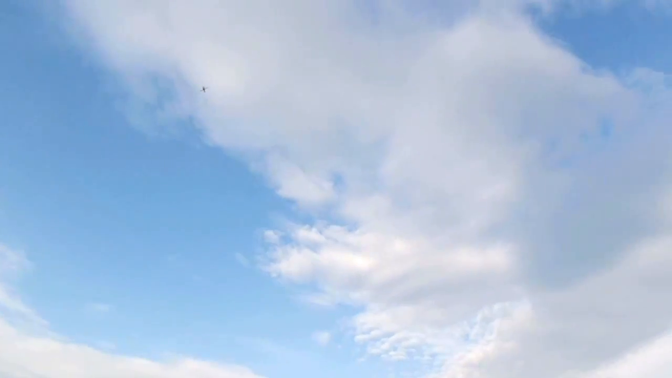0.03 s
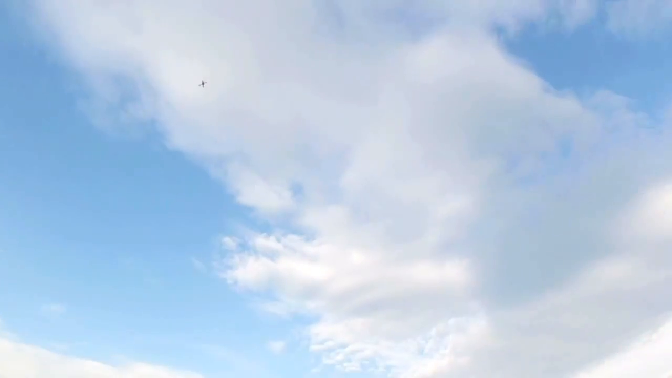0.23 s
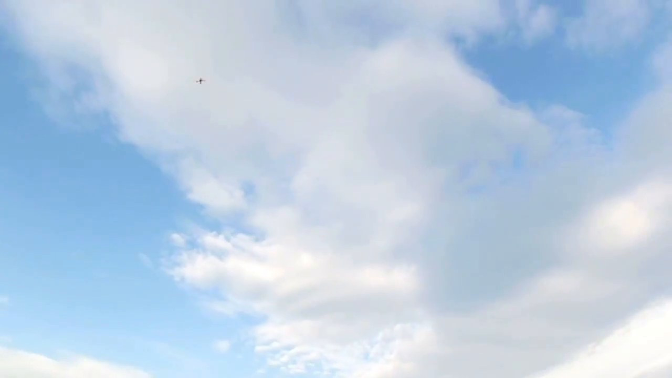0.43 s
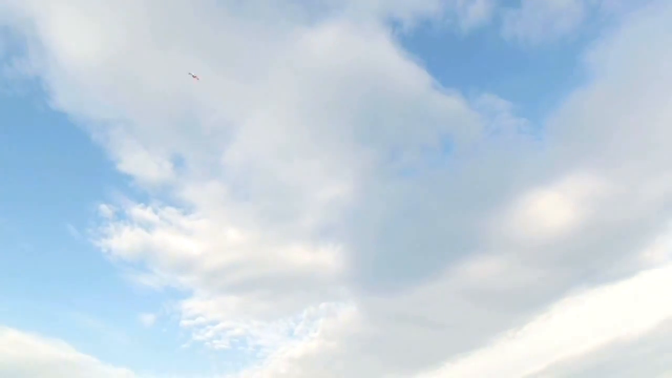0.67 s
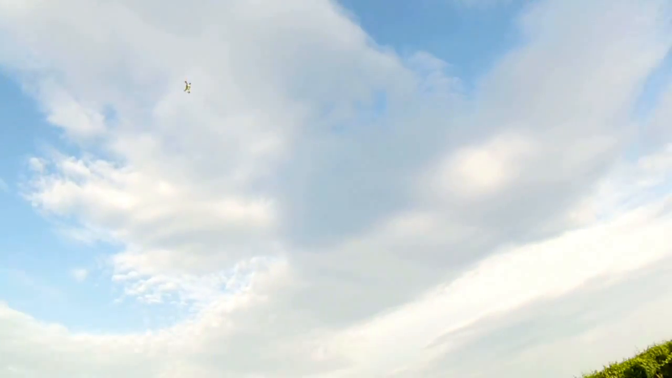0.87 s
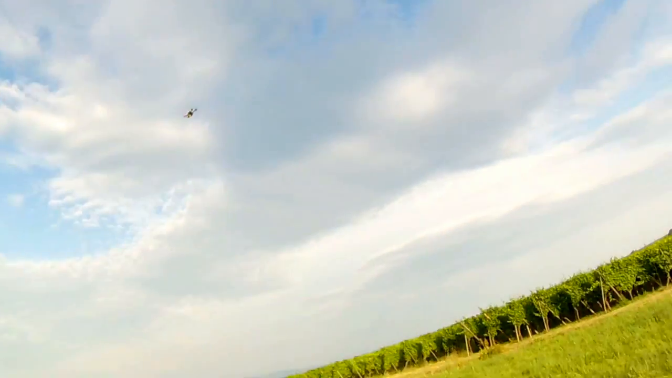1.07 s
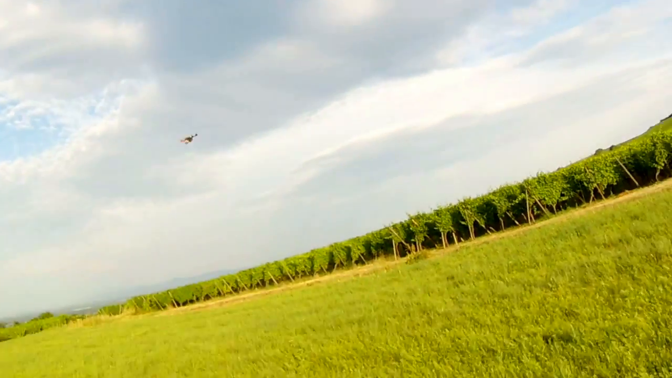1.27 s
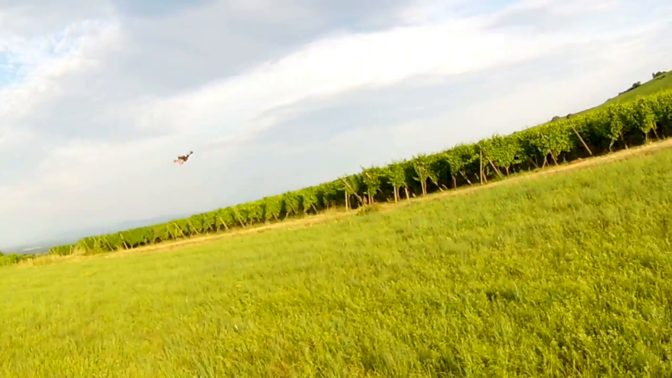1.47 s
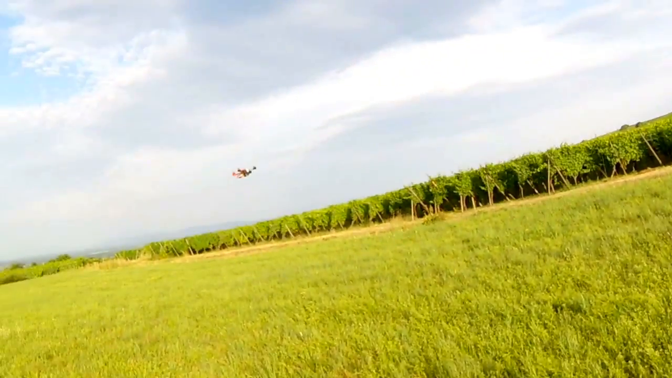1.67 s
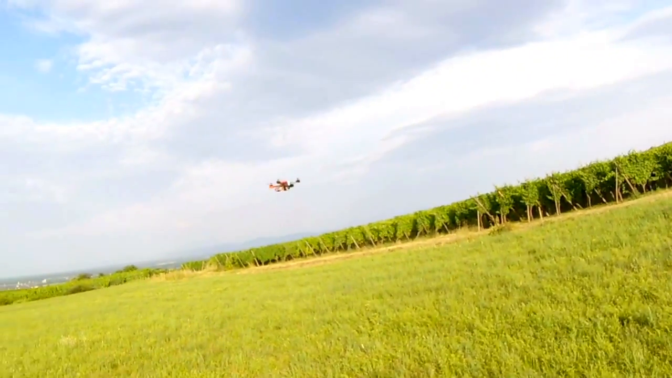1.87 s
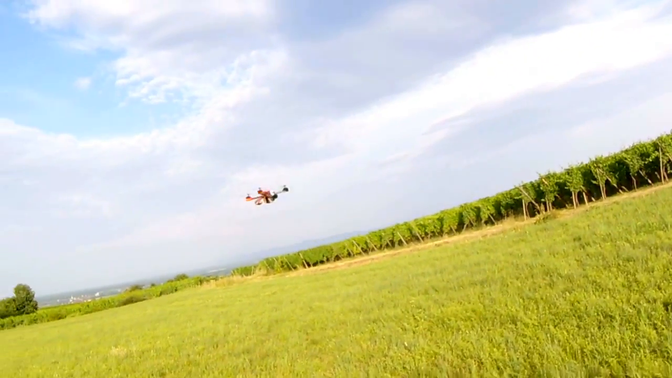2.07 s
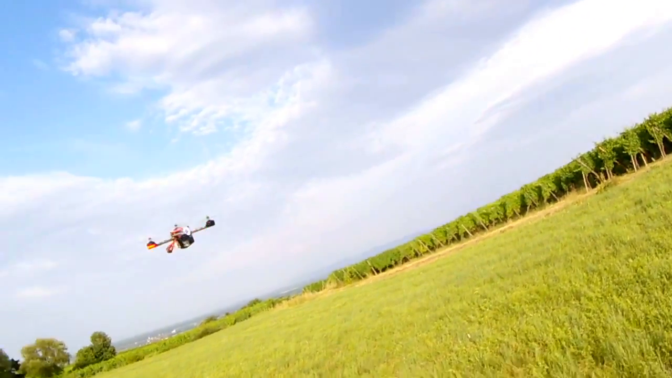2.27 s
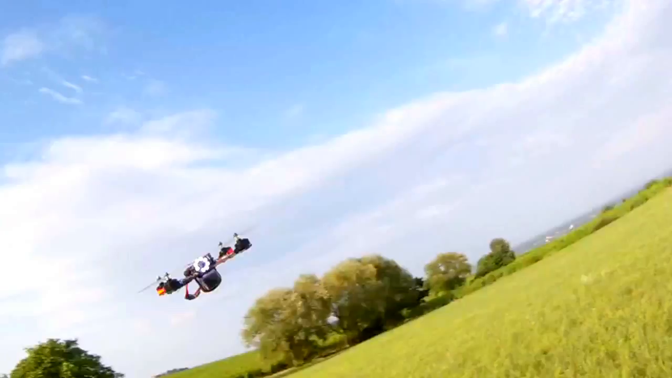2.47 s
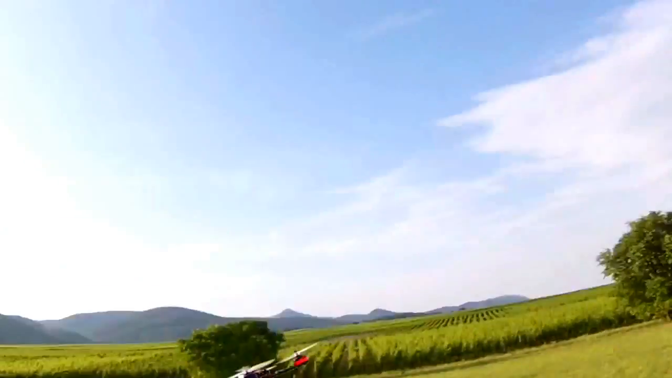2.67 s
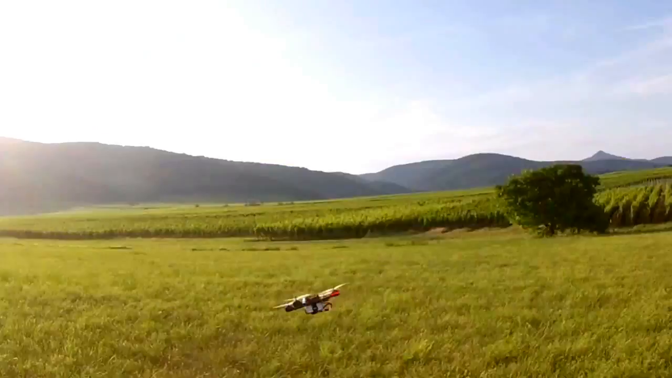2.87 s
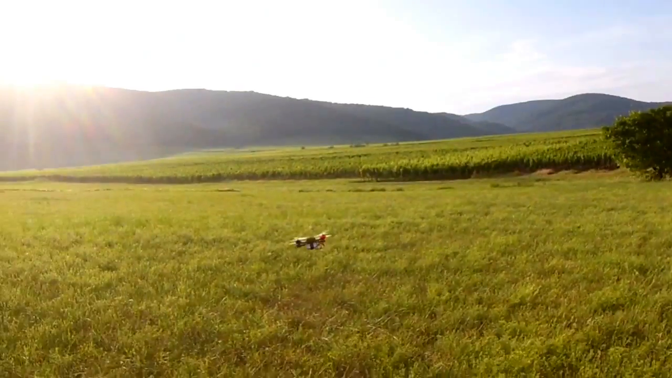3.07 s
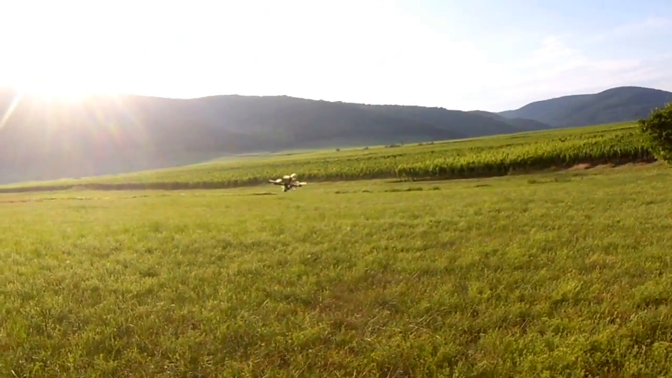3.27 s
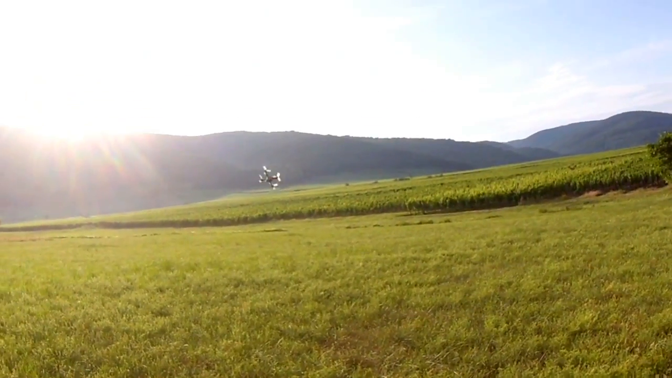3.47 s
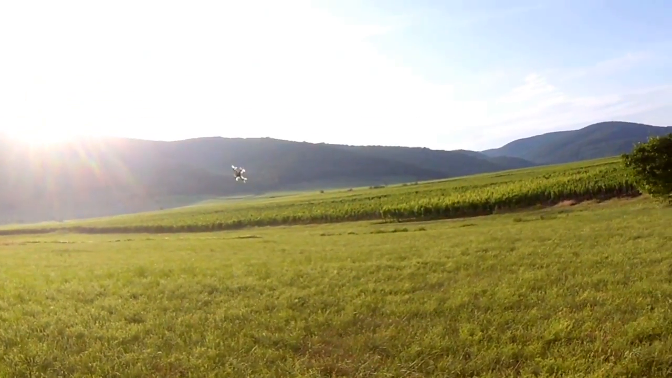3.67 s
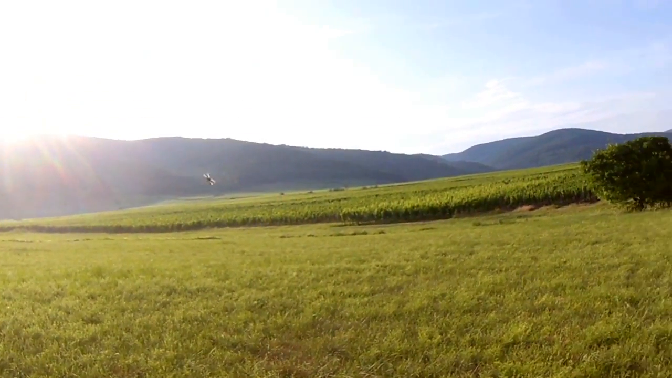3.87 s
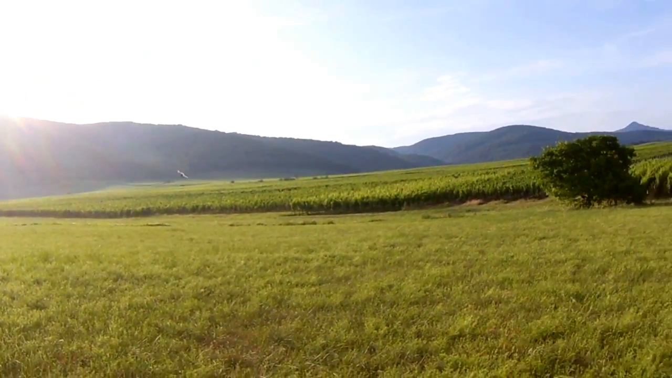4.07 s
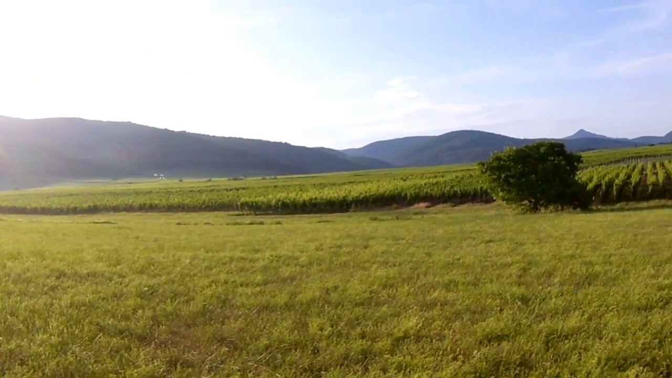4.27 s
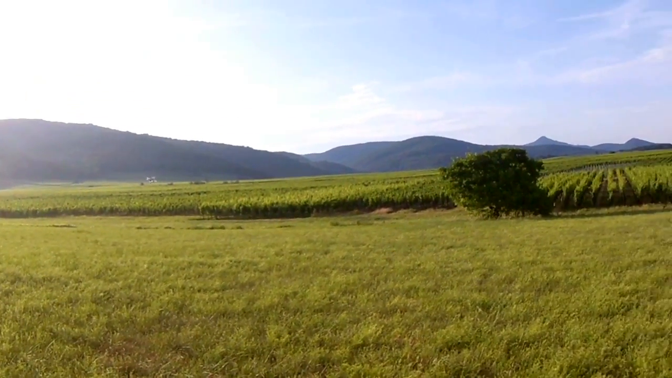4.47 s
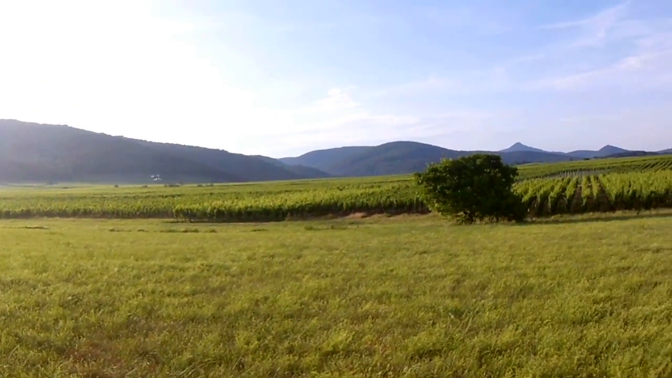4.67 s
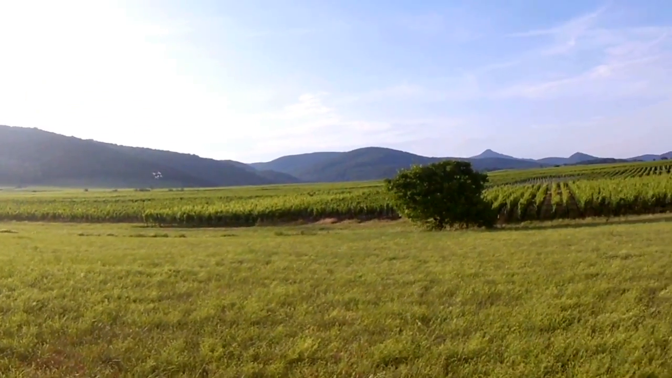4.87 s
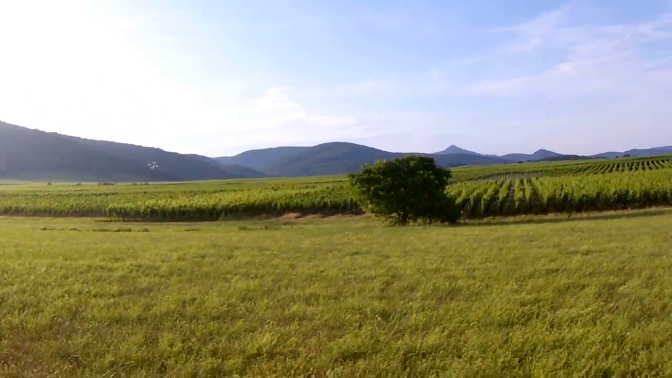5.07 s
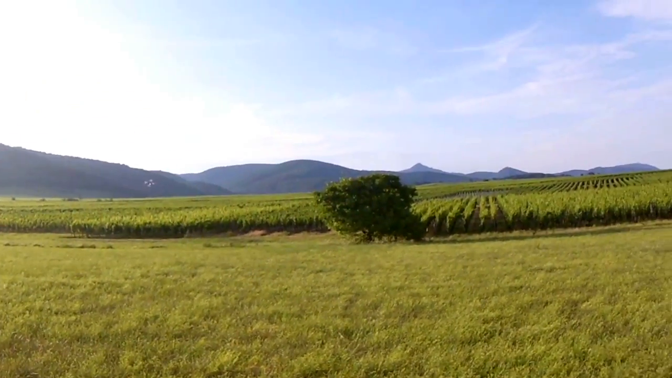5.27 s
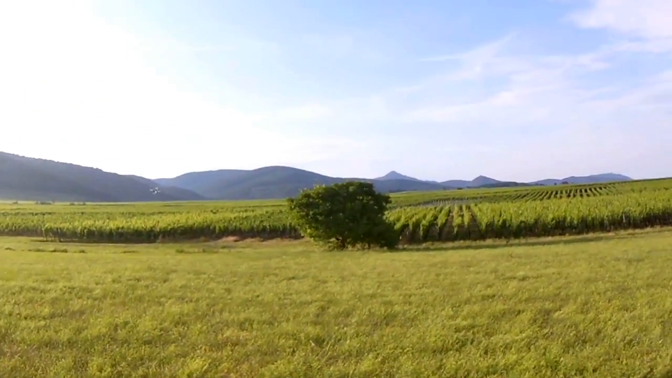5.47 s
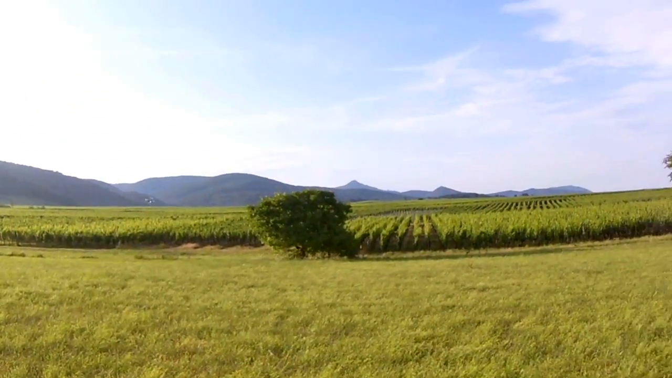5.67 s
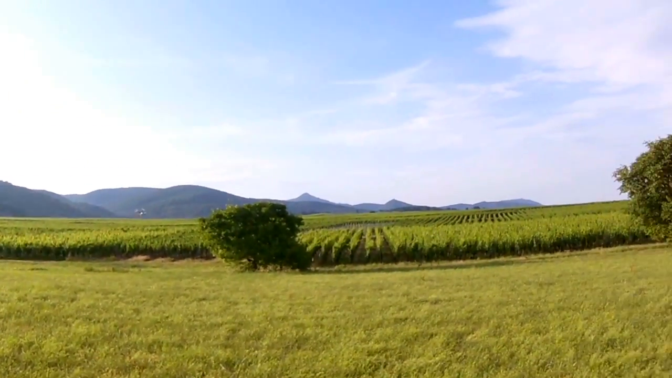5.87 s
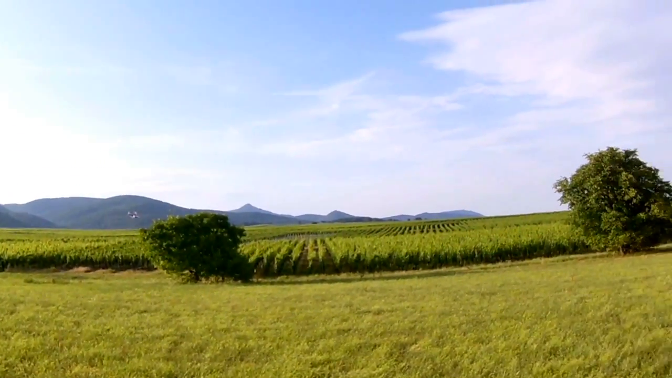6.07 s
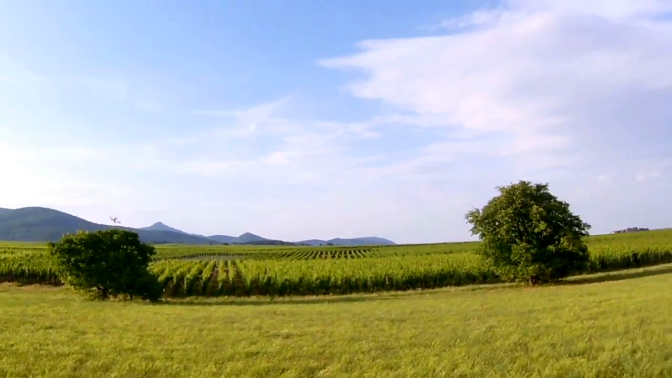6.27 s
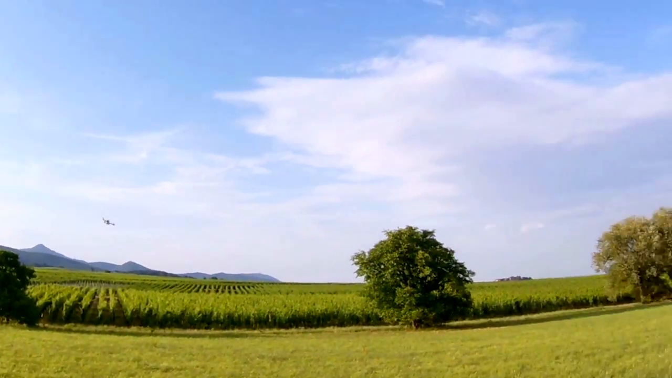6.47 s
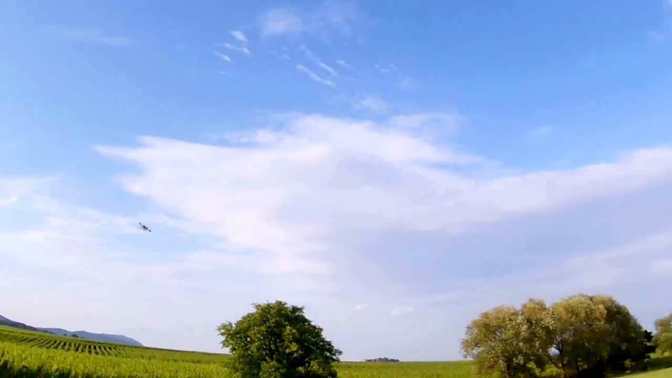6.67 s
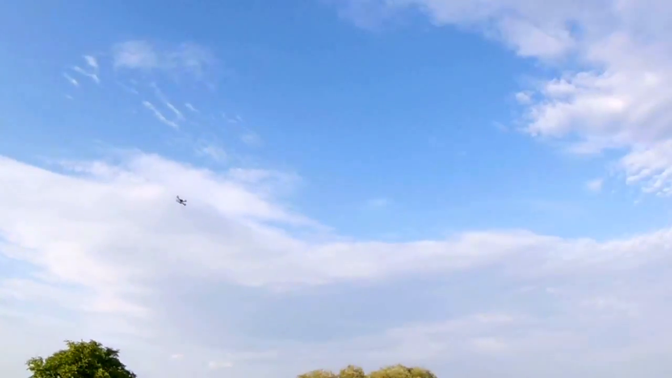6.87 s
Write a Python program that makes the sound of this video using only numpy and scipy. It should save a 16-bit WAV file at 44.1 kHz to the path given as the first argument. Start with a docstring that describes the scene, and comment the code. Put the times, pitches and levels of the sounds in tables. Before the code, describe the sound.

Soft outdoor air, then a four-propeller drone howls past close by, fades, whines up again twice, its pitch swinging with each throttle punch.

```python
"""First a soft rush of outdoor air over a faint whine; then a racing quadcopter dives in over an open field.
It passes close by, flies off and turns back, its throttle punched five times.
Four three-blade propellers at unequal speeds are sums of sine tones that beat; their wakes are chopped noise.
Loudness follows distance, heading and rotor speed; seen edge-on the rotors whine, face-on they rush.
A faint scatter from the field, ticks, low puffs of air and steady microphone hiss complete it."""
import sys
import numpy as np
from scipy import signal
from scipy.fft import rfft, irfft, next_fast_len
from scipy.io import wavfile
from scipy.ndimage import uniform_filter1d, map_coordinates

SR = 44100
rng = np.random.default_rng(int(sys.argv[2]) if len(sys.argv) > 2 else 0)


def wav_record(signal):
    """Record a signal, one row per channel, as 16-bit PCM in the file named by sys.argv[1]."""
    frames = np.transpose(np.atleast_2d(signal))
    bounded = np.clip(frames, -1, 1)
    # unit amplitude maps onto the largest positive 16-bit level
    quanta = np.round(bounded * 32767).astype(np.int16)
    wavfile.write(sys.argv[1], SR, quanta)


N = 304995  # length in samples, about 6.9 s

# blade rate between the throttle punches: time_s, fast_propeller_hz, slow_propeller_hz
CRUISE_SPEED = [(0, 631.3, 517.7), (.8, 648.4, 520), (.97, 511.7, 420), (1.15, 556.3, 495),
                (1.79, 492.6, 471.1), (1.89, 515.6, 460.6), (1.99, 558.5, 490.3), (2.25, 579, 499),
                (2.59, 550.5, 497.8), (2.9, 553.2, 501), (3.6, 591.2, 531.1), (4.17, 549.8, 494.1),
                (4.52, 641.6, 582.7), (5.02, 519.3, 491.2), (5.21, 586.2, 473), (5.37, 562.7, 524.7),
                (5.6, 634.2, 588.7), (5.72, 613, 608), (6.07, 762, 677.6), (6.25, 730, 637),
                (6.68, 737.8, 662), (6.92, 778, 731)]
# throttle punches: start_s, rise_s, hold_s, fall_s, fast_gain_hz, slow_gain_hz, slow_extra_db
THROTTLE_PUNCHES = [(1.134, 0.3, .075, .26, 641, 540, 3), (2.922, .243, .04, .3, 430.4, 257.2, -13.5),
                    (4.598, .17, 0.0099, .16, 125.4, 112.1, 1), (5.69, .16, .046, 0.16, 188.9, 201.1, 1),
                    (6.267, .3, 0.75, 0.19, 332.3, 241.4, -7)]
# loudness of the craft at the microphone, from distance and heading: time_s, level_db
CRAFT_LOUDNESS = [(0, -29.5), (.77, -28), (.9, -15.5), (1.2, -10), (1.3, -4), (1.48, -3), (1.535, 1),
                  (1.66, -8.5), (2.05, -7), (2.31, 1.5), (2.74, 4.5), (3.06, 0), (3.28, -4.5), (3.5, -10.5),
                  (4.13, -17), (4.42, -4.5), (4.79, -3), (5.01, -5), (5.35, -5), (5.49, -17.5), (6.35, -19),
                  (6.56, -13.5), (6.87, -5)]
# how the rotors lean toward the microphone: time_s, lean (0 face-on to 1 edge-on)
ROTOR_LEAN = [(0, 0.48), (1.18, 0.24), (1.3, 0.25), (1.46, 0.31), (1.62, 0.45), (2.1, 0.2), (2.37, 0.32),
              (2.6, 0.032), (2.86, .25), (3, 0), (3.12, 0.84), (3.27, 0.79), (3.36, 0.24), (4.6, 0.058),
              (5.3, 0.12), (5.55, 0.22), (5.9, 0.36), (6.12, 0.18), (6.33, 0.46), (6.47, 0.48),
              (6.52, 0.93), (6.92, 0.71)]
# how disturbed the air is that the blades cut: time_s, roughness (0 to 1)
TURBULENCE = [(0, .8), (1.1, .7), (1.3, .55), (1.42, .7), (1.55, .6), (1.65, .45), (1.8, .2), (2.3, .07),
              (2.85, .1), (3, .2), (3.1, .1), (3.3, .1), (3.45, .35), (4.2, .7), (4.8, .4), (5.4, .3),
              (5.8, .12), (6.3, .14), (6.55, .05), (6.92, .07)]

# level laws, one row each: base_db (craft loudness 0 dB, face-on, at HOVER_HZ), speed_db_per_octave, edge_on_db
FUNDAMENTAL_LAW = (-56.5, 14.94, 22.6)
OCTAVE_LAW = (-53, 6.3, 0.42)
THIRD_HARMONIC_LAW = (-64, 3.1, -12)
WASH_LAW = (-48.5, 8.7, -5)
TIP_LAW = (-59, 9.7, -10)

# tones of unequal blades, against the fundamental: shaft_multiple, level_db
UNBALANCE_TONES = [(1, -23), (2, -26), (4, -14), (5, -27), (7, -57), (8, -55)]
# upper blade tones, against the third harmonic: shaft_multiple, level_db
OVERTONES = [(12, -0.5), (15, -12), (18, -21.5), (21, -21.5), (24, -20.5)]
# how well the unbalance tones and overtones radiate: pitch_hz, level_db
RADIATION = [(100, -6.5), (185, 1), (300, 2), (1700, -15), (2400, 1), (3300, -13.5), (4700, -13.5),
             (6000, -21), (15000, -17)]
# brief dips of the fast propeller's fundamental: center_s, depth_db, half_length_s
WHINE_DIPS = [(1.285, 0, 0.0065), (3.224, 1.5, 0.011), (6.548, 13, .016), (6.638, 6.5, .016),
              (6.764, 10, 0.013), (6.915, 6, 0.021)]
# how strongly the octave above the blade tone stands out over time: time_s, level_db
OCTAVE_STRENGTH = [(1.1, 0.5), (1.35, 2), (1.6, -4), (1.72, -5.5), (2.2, -11), (2.3, -1.5), (2.65, 2.5),
                   (2.88, -7), (2.96, 3.5), (3.04, 9.5), (3.11, -8.5), (3.3, -1.5), (3.7, -0.5), (4.4, 1),
                   (4.78, 3.5), (5.02, 1.5), (5.33, 5.5), (5.5, -3.5), (5.85, 2.5), (6.45, -7), (6.65, 2),
                   (6.92, -2)]
# how strongly the third harmonic, overtones and blade-tip noise stand out over time: time_s, level_db
TREBLE_STRENGTH = [(0, -7.5), (1.5, 2), (2.4, 0.5), (3, 1), (3.25, 1.5), (3.6, -2.5), (4.2, -2),
                   (5.35, -5.5), (5.87, 2), (6.3, -6), (6.92, -6.5)]

# color of the broad wake noise, before leveling: pitch_hz, relative_db_per_hz
WASH_COLOR = [(20, -85), (80, -43), (140, -23.5), (200, -20.5), (350, -12.5), (580, 5), (700, -5),
              (850, 3.5), (1200, 11.5), (1600, 6), (2200, -1.5), (2700, -14.5), (3200, -39), (5000, -42.5)]
# color of the blade-tip noise, before leveling: pitch_hz, relative_db_per_hz
TIP_COLOR = [(1500, -26), (2300, 14), (2800, 6), (3300, -2.5), (4200, -3), (5000, -9), (5600, -22.5),
             (7000, -25.5), (10000, -35), (15000, -34.5)]
# thin high sizzle of the craft: time_s, level_db
SIZZLE_LEVEL = [(4.1, -100), (4.4, -88), (4.75, -78), (4.95, -106), (5.3, -86), (5.55, -92), (5.9, -86),
                (6.2, -91), (6.92, -85)]
# sharp ticks as the craft passes: start_s, envelope_peak_db, pitch_hz
TICKS = [(2.156, -36, 1500), (2.479, -44, 3400), (2.784, -35, 1600), (2.936, -27, 1200)]

# outdoor air: time_s, rush_db, breeze_on_microphone_db
AIR_LEVEL = [(0, -63.5, -83), (.8, -62, -81), (1.1, -59, -91.5), (1.8, -62, -86), (2.8, -56.5, -81.5),
             (3.5, -62.5, -85.5), (4.2, -60, -81), (5.2, -62, -83.5), (5.65, -61, -77.5), (6.1, -60, -71.5),
             (6.5, -60, -87), (6.92, -64.5, -87.5)]
# color of the rush of air, before leveling: pitch_hz, relative_db_per_hz
RUSH_COLOR = [(30, -51.5), (80, -29), (130, -10), (200, -1.5), (300, 2.5), (450, 3), (640, 0.5), (720, -2),
              (1200, -6.5), (2200, -15), (3500, -40)]
# color of the breeze on the microphone, before leveling: pitch_hz, relative_db_per_hz
BREEZE_COLOR = [(20, -11), (45, -8), (80, 1.5), (130, 5), (200, -0.5), (300, -12), (500, -42)]
# color of the microphone hiss, before leveling: pitch_hz, relative_db_per_hz
HISS_COLOR = [(100, -5), (3000, 9.5), (5000, 2), (7000, 5), (9000, 0.5), (11500, -1.5), (15000, 0)]
# soft low puffs of air on the microphone: center_s, level_db, half_length_s
PUFFS = [(2.728, -59, 0.017), (3.417, -60.5, 0.014), (6.11, -61.5, .015), (6.196, -61, 0.033),
         (6.31, -63.5, 0.021)]
# color of the puffs, before leveling: pitch_hz, relative_db_per_hz
PUFF_COLOR = [(30, -36), (90, -5), (170, 5), (260, 3), (400, -1), (800, -45.5)]

HOVER_HZ = 600  # blade rate at which the level laws give their base level
ROCK_HZ, ROCK_SHARE, CALM = 9, .09, .06  # rocking rate, its strength, roughness below which there is none
FADING_DB = 1.82  # how far each tone swells and fades as the craft wobbles
SLOW_OCTAVE_DB = -3  # octave of the slow pair against that of the fast pair
# level of the lowest-pitched propeller against the slow one: it grows quieter as the throttle rises
LOWEST_DB, LOWEST_DB_PER_OCTAVE, LOWEST_REF_HZ = -9, -10, 500
TOP_HZ = 15200  # band limit


def amp(db):
    """Turn decibels into a gain."""
    return 10 ** (np.asarray(db) / 20)


def unit(x):
    """Scale to an average strength (rms) of 1."""
    return x / np.sqrt(np.mean(x ** 2) + 1e-20)


def along(points, hz):
    """Read a table of pitch and value, evenly in octaves."""
    point_hz, value = np.transpose(points)
    return np.interp(np.log(hz + 1), np.log(point_hz + 1), value)


def curves(rows):
    """Draw each column after the time as a curve with one value per sample."""
    time_s, *columns = np.transpose(rows)
    return [np.interp(np.arange(N) / SR, time_s, column) for column in columns]


def wobble(rate):
    """A smooth random curve with this many random points a second."""
    knots = rng.standard_normal(N // 16)
    coarse = np.arange(0, N + 32, 32)  # compute every 32nd sample, join with lines
    values = map_coordinates(knots, [coarse * rate / SR], mode="wrap")
    return np.interp(np.arange(N), coarse, values)


def filtered(x, response):
    """Multiply the spectrum of x by a response that depends on pitch."""
    size = next_fast_len(N + SR // 4)
    hz = np.fft.rfftfreq(size, 1 / SR)
    return irfft(rfft(x, size) * response(hz), size)[:N]


def noise(color, patchy_db):
    """Colored noise of rms 1, with random louder and softer patches in time and pitch."""
    grid = signal.stft(rng.standard_normal(N), nperseg=1024)[2]
    patches = uniform_filter1d(rng.standard_normal(grid.shape), size=5, axis=0)
    patches = uniform_filter1d(patches, size=7, axis=1)
    patchy = signal.istft(grid * amp(patchy_db * unit(patches)), nperseg=1024)[1][:N]
    return unit(filtered(patchy, lambda hz: amp(along(color, hz))))


def ease(u):
    """A smooth step from 0 to 1."""
    return .5 - .5 * np.cos(np.pi * np.clip(u, 0, 1))


def throttle():
    """Each punch lifts the blade rates, holds them and lets them sink; it also shifts the slow level."""
    t = np.arange(N) / SR
    fast_hz, slow_hz = curves(CRUISE_SPEED)
    slow_db = np.zeros(N)
    for start, rise, hold, fall, fast_gain_hz, slow_gain_hz, extra_db in THROTTLE_PUNCHES:
        end = start + rise + hold + fall
        push = ease((t - start) / rise) * ease((end - t) / fall)
        fast_hz = fast_hz + fast_gain_hz * push
        slow_hz = slow_hz + slow_gain_hz * push
        slow_db = slow_db + extra_db * push
    return fast_hz, slow_hz, slow_db


def level(law, blade_hz):
    """Level in dB of one part of the rotor sound: craft loudness, speed and lean each add to it."""
    base_db, per_octave_db, edge_db = law
    craft_db, = curves(CRAFT_LOUDNESS)
    lean, = curves(ROTOR_LEAN)
    speed_db = per_octave_db * np.log2(blade_hz / HOVER_HZ)
    return base_db + craft_db + speed_db + edge_db * np.clip(lean, 0, 1)


def whine_dips():
    """Brief, rounded losses of the fast propeller's fundamental, in dB."""
    t = np.arange(N) / SR
    return sum(db * np.exp(-((t - center) / length) ** 2) for center, db, length in WHINE_DIPS)


def shaft_rate(blade_hz, speed, hunt, rough):
    """Turns per second: the speed wanders, and disturbed air adds rocking and jitter."""
    # the craft rocks and the controller swings the speed, most at low throttle
    rocking = ROCK_SHARE * np.maximum(rough - CALM, 0) * (HOVER_HZ / blade_hz) ** 2
    swing = np.sin(2 * np.pi * ROCK_HZ * np.arange(N) / SR + 1.6 * wobble(6))
    correction = hunt * wobble(9) + rocking * swing
    eddy_jitter = rough * (.024 * wobble(45) + .028 * wobble(170))
    return speed * blade_hz * (1 + correction + eddy_jitter) / 3  # three blades per turn


def propeller(blade_hz, speed, hunt, gain_db, unbalance_db=0, dip_db=0, bright_db=0):
    """Blade passages are pressure pulses, built as sine tones on multiples of the shaft rate."""
    first_db = level(FUNDAMENTAL_LAW, blade_hz)
    octave_db = level(OCTAVE_LAW, blade_hz) + bright_db + curves(OCTAVE_STRENGTH)[0]
    third_db = level(THIRD_HARMONIC_LAW, blade_hz) + curves(TREBLE_STRENGTH)[0]
    rough, = curves(TURBULENCE)
    shaft_hz = shaft_rate(blade_hz, speed, hunt, rough)
    angle = 2 * np.pi * np.cumsum(shaft_hz) / SR

    tone_levels = [(3, first_db - dip_db), (6, octave_db), (9, third_db)]
    # unequal blades add other multiples of the shaft rate
    weak_tones = [(k, first_db + unbalance_db + db) for k, db in UNBALANCE_TONES]
    weak_tones += [(k, third_db + db) for k, db in OVERTONES]
    for k, db in weak_tones:
        tone_levels.append((k, db + along(RADIATION, k * shaft_hz)))

    tones = np.zeros(N)
    for k, db in tone_levels:
        # eddies change the blade load and shake the upper tones harder
        flutter = .3 * wobble(220) if k <= 3 else .8 * wobble(450)
        load = 1 + rough * (1.09 * wobble(45) + flutter)
        wave = np.sin(k * angle + rng.uniform(0, 2 * np.pi))
        tones += amp(db + FADING_DB * wobble(11)) * load * wave
    return np.sqrt(2) * amp(gain_db) * tones, angle


def buzz(angle, blade_db, count=18):
    """Blades cut the same eddies turn after turn: fluttering tones on shaft multiples, rms 1."""
    shaft_hz = np.gradient(angle) * SR / (2 * np.pi)
    lines, power = np.zeros(N), np.zeros(N)
    for k in range(4, count + 1):
        on_blade = k % 3 == 0  # multiples of the blade rate are stronger
        gain = amp(along(WASH_COLOR, k * shaft_hz) + blade_db * on_blade)
        lines += gain * (wobble(28) * np.cos(k * angle) + wobble(28) * np.sin(k * angle))
        power += gain ** 2
    return unit(lines / np.sqrt(power))


def wake(blade_hz, angles, chop):
    """Part of the wake buzzes with the shafts, part rushes freely; both are chopped at the blade rate."""
    pulsing = unit(1 + chop * np.cos(3 * angles[0]))
    buzzing = unit(sum(buzz(angle, blade_db=7) for angle in angles))
    wash_db = level(WASH_LAW, blade_hz) + 1.2 * wobble(14)  # gusty
    wash = amp(wash_db) * unit(noise(WASH_COLOR, patchy_db=2.2) + .9 * buzzing)
    tip_db = level(TIP_LAW, blade_hz) + curves(TREBLE_STRENGTH)[0]
    tips = amp(tip_db) * noise(TIP_COLOR, patchy_db=3.0)
    return pulsing * (wash + tips)


def sizzle():
    """A thin high sizzle: noise in a narrow band around 5020 Hz."""
    sizzle_db, = curves(SIZZLE_LEVEL)
    band = filtered(rng.standard_normal(N), lambda hz: np.exp(-((hz - 5020) / 230) ** 2))
    return amp(sizzle_db) * unit(band)


def ticks():
    """Short dry ticks: sine waves that rise and die away within a few cycles."""
    out, t = np.zeros(N + SR), np.arange(SR // 40) / SR
    u = t / .0006  # the envelope peaks after 0.6 ms
    for start, db, hz in TICKS:
        tick = amp(db) * u * np.exp(1 - u) * np.sin(2 * np.pi * hz * t)
        out[round(start * SR):][:len(t)] += tick
    return out[:N]


def field(x, t60):
    """Faint, dull scatter from grass and vine rows: a noise tail that falls 60 dB in t60 seconds."""
    t = np.arange(SR // 2) / SR
    tail = rng.standard_normal(len(t)) * amp(-60 * t / t60) * (t > .006)
    scatter = signal.fftconvolve(x, tail / np.linalg.norm(tail))[:N]
    return filtered(scatter, lambda hz: 1 / (1 + (hz / 3500) ** 2))


def puffs():
    """Each puff of air on the microphone is a brief swell of low noise."""
    t = np.arange(N) / SR
    swell = sum(amp(db) * np.exp(-((t - center) / length) ** 2) for center, db, length in PUFFS)
    return swell * noise(PUFF_COLOR, patchy_db=3.0)


def outdoors():
    """Colored noises: a rush of air, a light breeze on the microphone and its steady hiss."""
    rush_db, breeze_db = curves(AIR_LEVEL)
    rush = amp(rush_db) * noise(RUSH_COLOR, patchy_db=2.0)
    breeze = amp(breeze_db + 1.2 * wobble(13)) * noise(BREEZE_COLOR, patchy_db=1.0)
    hiss = amp(-76.5) * noise(HISS_COLOR, patchy_db=0.0)
    return rush + breeze + hiss


def scene():
    """Two leading propellers with a partner each, then wake, field and outdoor air."""
    fast_hz, slow_hz, slow_db = throttle()
    fast, fast_angle = propeller(fast_hz, speed=1, hunt=.001, gain_db=0, dip_db=whine_dips())
    slow, slow_angle = propeller(slow_hz, speed=1, hunt=.001, gain_db=slow_db,
                                 unbalance_db=-7, bright_db=SLOW_OCTAVE_DB)
    third, _ = propeller(fast_hz, speed=0.9, hunt=0.032, gain_db=-0.5)
    lowest_db = LOWEST_DB + LOWEST_DB_PER_OCTAVE * np.log2(slow_hz / LOWEST_REF_HZ)
    lowest, lowest_angle = propeller(slow_hz, speed=.775, hunt=0.006054, gain_db=slow_db + lowest_db,
                                     bright_db=SLOW_OCTAVE_DB)
    rough, = curves(TURBULENCE)
    # the third propeller stands out only while it fights disturbed air
    whine = fast + slow + rough * third + lowest
    rotor_wake = wake(fast_hz, [fast_angle, slow_angle, lowest_angle], chop=0.043)
    craft = whine + rotor_wake + sizzle() + ticks()
    craft = filtered(craft, lambda hz: 1 - 1 / (1 + (hz / 130) ** 4))  # small rotors radiate no bass
    scatter = amp(-22) * field(craft, t60=0.4)
    return (craft + scatter + outdoors() + puffs())[None]


def record(dry):
    """Remove everything above the band limit."""
    return filtered(dry[0], lambda hz: hz < TOP_HZ)[None]


dry = scene()
out = record(dry)
wav_record(out)
```